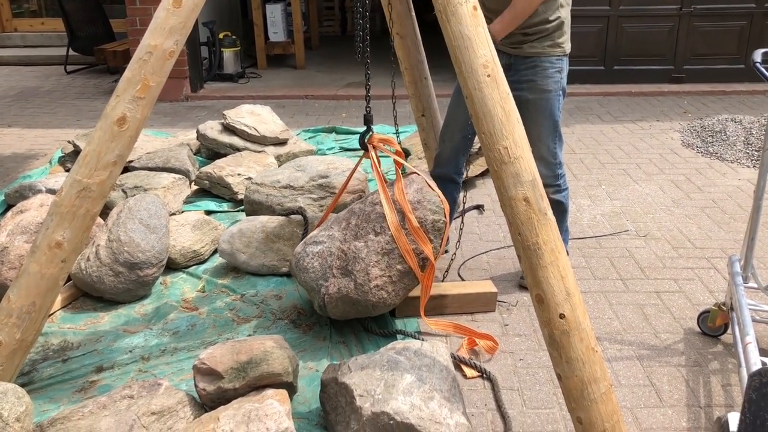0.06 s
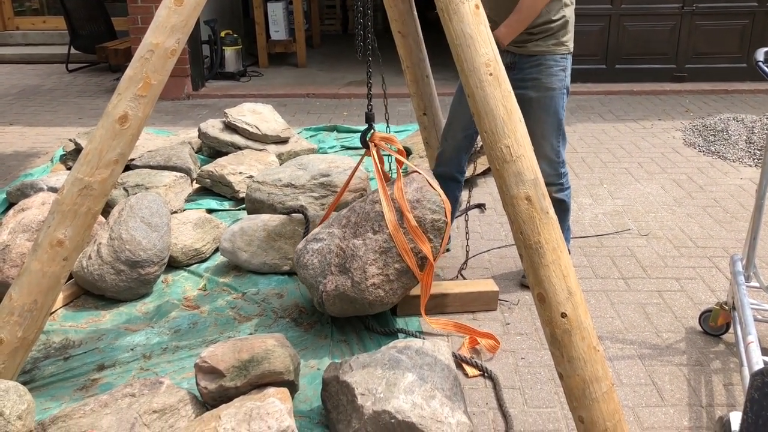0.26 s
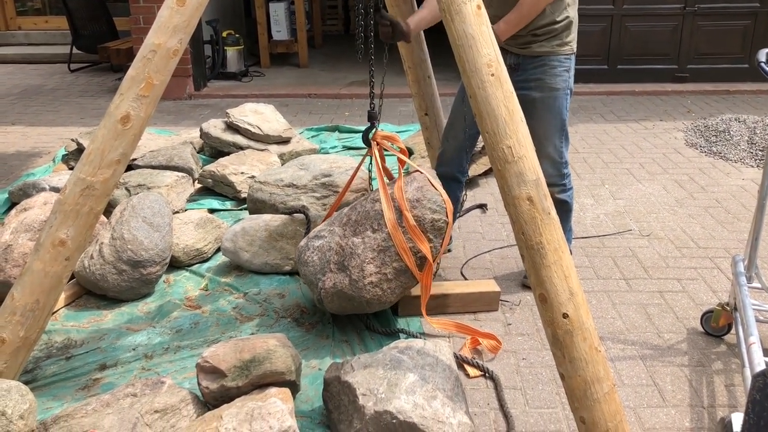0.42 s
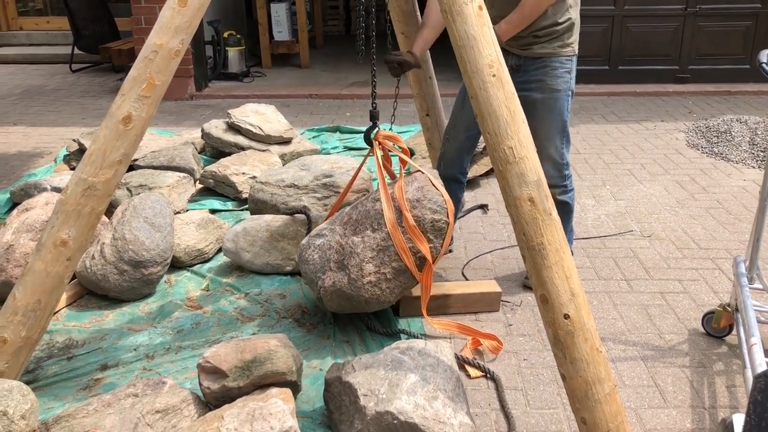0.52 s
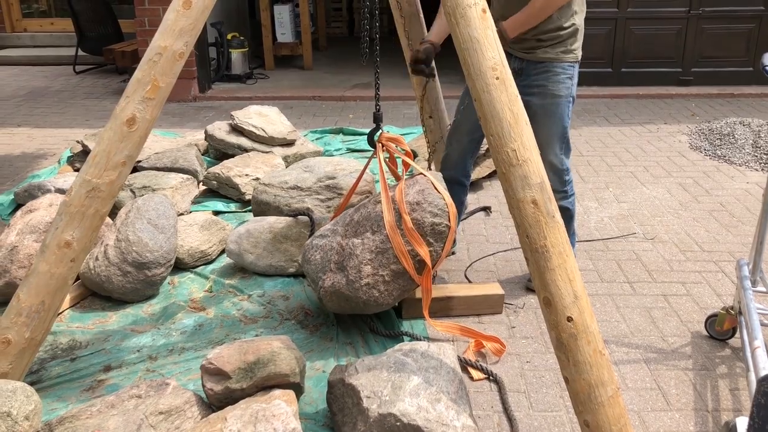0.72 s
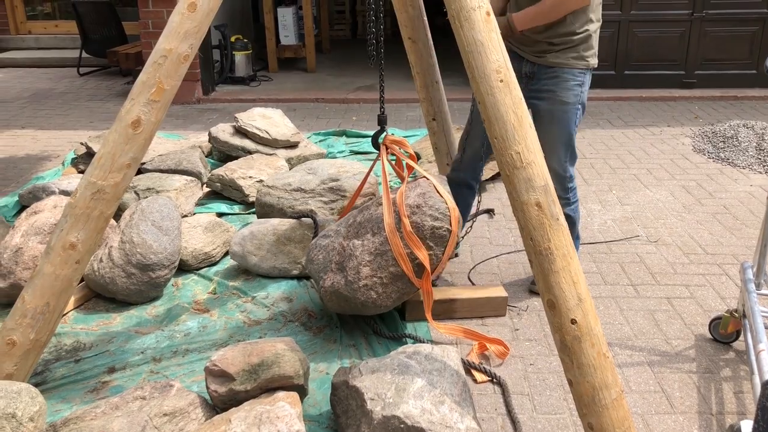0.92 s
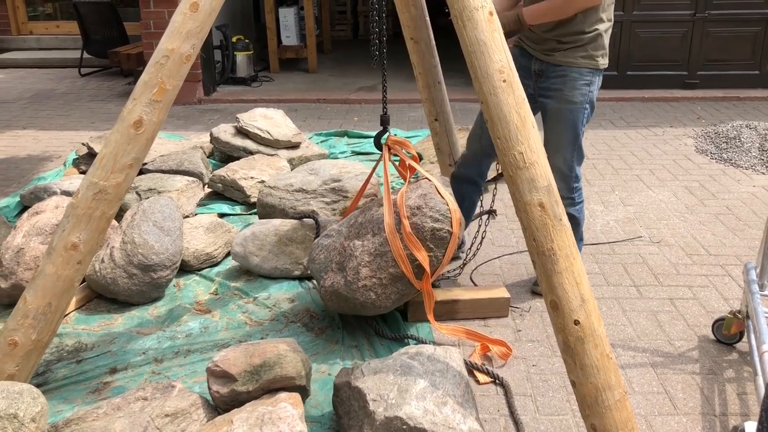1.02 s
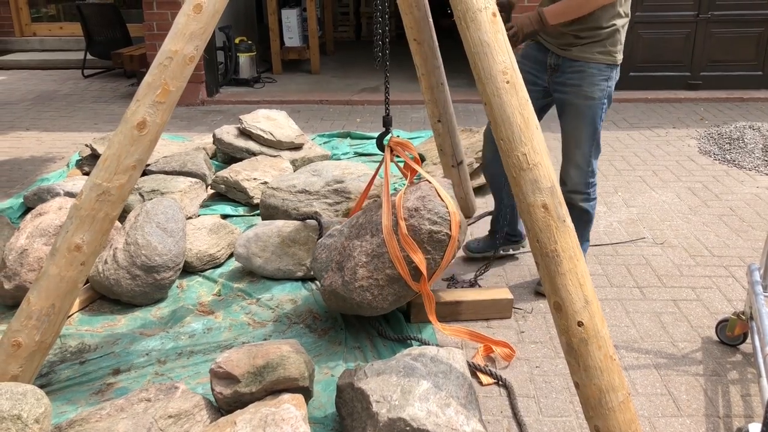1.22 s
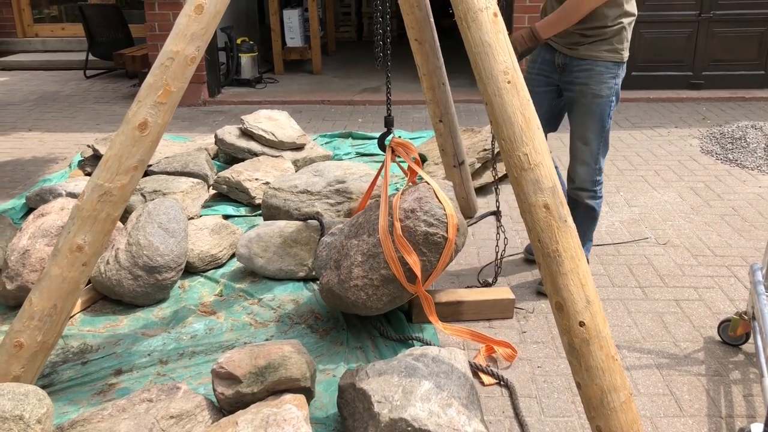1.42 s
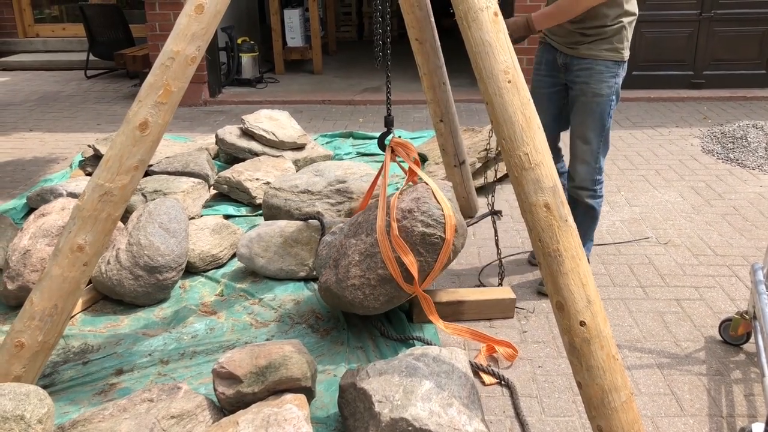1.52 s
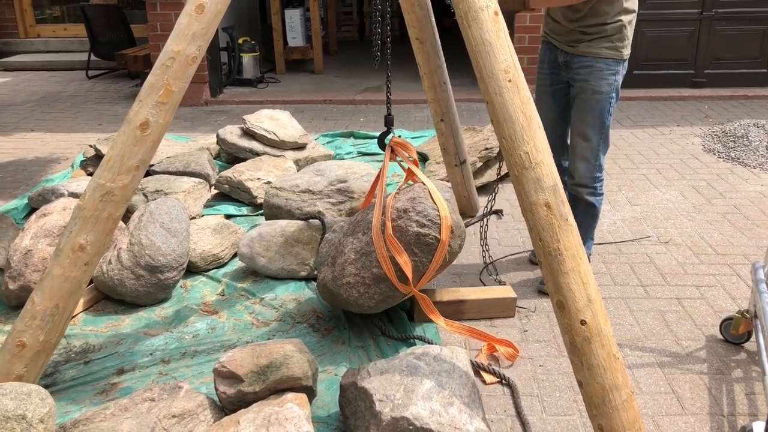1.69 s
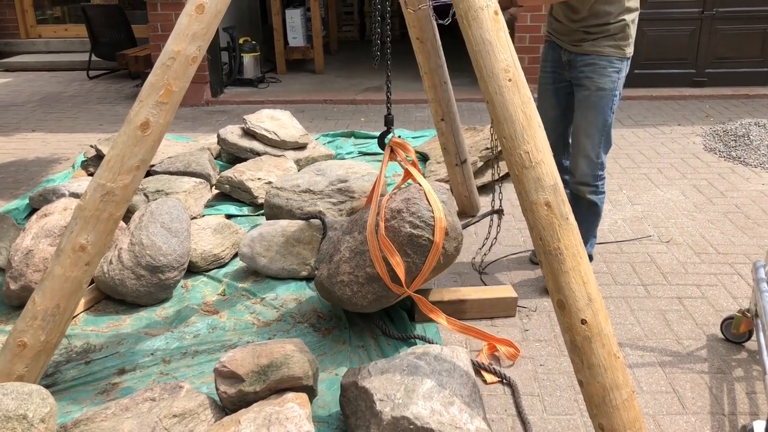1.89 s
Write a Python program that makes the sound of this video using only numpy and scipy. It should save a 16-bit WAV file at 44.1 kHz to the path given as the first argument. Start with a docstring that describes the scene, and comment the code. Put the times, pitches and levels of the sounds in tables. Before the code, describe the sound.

A hand chain hoist is pulled once outdoors. Faint clinks and a small knock start it; from 0.22 to 0.6 seconds steel links clatter rapidly, bright and ringing, over a hollow metal housing. A duller clank at 0.69 settles the load. From about 1.0 to 1.8, dry ticks, fine rustle and thin high sizzle follow, with soft footfalls near 1.45 and 1.86, over quiet low air.

```python
"""Chain hoist in a paved yard

One quick pull on a hand chain hoist that holds a boulder: steel links clatter over the hand wheel and
knock its sheet-metal housing. Sprays of tiny random contacts set housing, links and wheel ringing.
The load settles with a clank, then slack chain and straps tick as short bursts of filtered noise.
House fronts and paving answer with scattered echoes. Around it, shaped noise makes a thin high sizzle,
dull footfalls and quiet outdoor air with a low drone.
"""
import sys
import numpy as np
from scipy import signal
from scipy.fft import rfft, irfft
from scipy.io import wavfile
from scipy.ndimage import uniform_filter1d

SR = 44100
rng = np.random.default_rng(int(sys.argv[2]) if len(sys.argv) > 2 else 0)


def to_wav(sig):
    """Store sig (one row per channel, or 1-D mono) as 16-bit WAV at the path in sys.argv[1].

    Samples outside -1..1 are clipped; the rate is SR.
    """
    pcm = np.clip(np.atleast_2d(sig), -1, 1) * 32767
    pcm = np.round(pcm).astype(np.int16)
    wavfile.write(sys.argv[1], SR, pcm.T)  # frames by channels


N = 85995  # length of the sound in samples

CONTACTS_PER_S = 4500  # tiny contacts in each single strike
RUN_PER_S = 1800  # contacts of the chain running over the wheel
BITE_DB = 2.5  # first touch of a strike, over the tiny contacts

# Tone of clashing steel: pitch_hz, level_db (relative)
CLASH_COLOUR = [(60, -34), (150, -12), (500, -2.5), (1400, 0), (2300, 0.5), (3500, -3), (5500, -2),
                (7000, -1), (10000, -2), (13500, -2.5), (15500, -0.5)]


def amp(db):
    """Turns decibels into a gain."""
    return 10 ** (np.asarray(db) / 20)


def unit(x):
    """Scales a sound to an average strength (rms) of 1."""
    return x / np.sqrt(np.mean(x ** 2) + 1e-20)


def crest(x):
    """Scales a sound so that its loudest 4 milliseconds have rms 1."""
    loudest_power = uniform_filter1d(x ** 2, size=180).max()
    return x / np.sqrt(loudest_power + 1e-20)


def level(points):
    """Draws a gain curve over time through points of time (s) and level (dB)."""
    times_s, levels_db = np.transpose(points)
    return amp(np.interp(np.arange(N) / SR, times_s, levels_db))


def add(mix, s, sound):
    """Mixes a sound in at time s, cutting it off at the end of the mix."""
    part = mix[max(round(s * SR), 0):][:len(sound)]
    part += sound[:len(part)]


def colour(x, points):
    """Gives a sound the drawn spectrum with a filter that responds only after its input."""
    hz, db = np.transpose(points)
    grid_hz = abs(np.fft.fftfreq(2048, 1 / SR)) + 1  # +1 avoids the logarithm of zero
    log_gain = np.log(amp(np.interp(np.log(grid_hz), np.log(hz), db)))
    # The Hilbert transform finds the phase that puts the filter's energy as early as possible
    response = np.exp(np.conj(signal.hilbert(log_gain)))
    return signal.fftconvolve(x, np.fft.ifft(response).real)[:len(x)]


def band(hz, width_hz):
    """Makes noise in one steep resonance; its gain is halved half a width from the centre."""
    off = (np.fft.rfftfreq(N, 1 / SR) - hz) / width_hz
    spectrum = rfft(rng.standard_normal(N)) / (1 + (2 * off) ** 4)
    return unit(irfft(spectrum, N))


def ring(x, modes):
    """Lets blows ring a body: each mode is a fading tone that loses 60 dB in t60 seconds."""
    t = np.arange(SR // 3) / SR
    body = np.zeros(len(t))
    for hz, db, t60 in modes:
        fade = np.exp(-np.log(1000) * t / t60)
        body += amp(db) * fade * np.cos(2 * np.pi * hz * t)
    return signal.fftconvolve(x, body)[:len(x)]


def contacts(per_s, count):
    """Makes sparse clicks of random size at random moments."""
    return rng.standard_normal(count) * (rng.random(count) < per_s / SR)


def hoist():
    """Links strike the wheel: the housing knocks, links ring, steel clashes, and the wheel sings."""
    # Single strikes: start_s, housing_knock_db, knock_hardness_hz, link_ring_db, link_pitch_hz, clash_db
    strikes = [(.018, -60, 746, -68, 3960, -93), (.083, -58.5, 930, -57, 4360, -61),
               (.098, -44, 816, -56.5, 4370, -62), (.176, -57.5, 800, -78, 4450, -72),
               (.145, -62, 905, -63.5, 4400, -59.5), (.208, -62, 824, -66, 4370, -63),
               (.223, -50, 1480, -62, 4400, -48.5), (.229, -56, 1500, -58, 4380, -43),
               (.236, -43.5, 805, -53, 4330, -58), (.258, -52, 1500, -47.5, 4370, -36.5),
               (.273, -42.5, 1150, -44.5, 4400, -68), (.285, -39, 1220, -66, 4320, -39),
               (.295, -40.5, 1510, -54, 4400, -45), (.319, -43, 1140, -37.5, 4413, -42),
               (.334, -36.5, 1090, -43, 4460, -35), (0.361, -45.5, 1530, -36.5, 4420, -34.5),
               (0.373, -37, 1580, -43, 4160, -61), (.389, -43.5, 1220, -38, 4500, -40.5),
               (0.398, -34, 1620, -36, 4490, -33), (.409, -45.5, 1470, -47, 4150, -41),
               (.434, -46, 1520, -41, 4800, -59), (0.441, -44, 1490, -38, 4263, -36),
               (.461, -49, 1510, -32.5, 4330, -34.5), (.469, -48, 1560, -67, 4300, -52),
               (.500, -35, 1470, -40, 4400, -41.5), (.508, -51, 1520, -37.5, 4410, -63),
               (.527, -64, 1520, -45, 4370, -37), (.552, -36, 960, -34, 4504, -53),
               (0.577, -43, 1220, -40, 4440, -41), (.622, -47, 1430, -69, 4380, -54),
               (.689, -51, 1800, -57, 4450, -57.5), (.884, -61, 1560, -71, 4240, -68),
               (1.178, -67, 2600, -77, 4300, -67), (1.638, -60, 2040, -71, 4680, -66.5),
               (1.772, -61, 2360, -67, 4500, -62), (1.780, -61, 2420, -58, 4480, -59),
               (1.800, -57, 2200, -74, 4300, -61)]
    # Chain running over the wheel: start_s, level_db
    run_levels = [(0, -67), (.13, -72.5), (.22, -74), (.232, -43), (.255, -54.5), (.266, -45), (.36, -43.5),
                  (.46, -40.5), (.54, -42.5), (.59, -45.5), (.63, -54), (.67, -76)]
    # Short-lived tones of the wheel: pitch_hz, level_db, t60_s
    wheel_modes = [(2760, -0.5, 0.012), (3560, -7, 0.011), (5300, -21, 0.015), (5480, 7.5, 0.012),
                   (6320, -1, 0.039), (6570, 8.5, 0.017), (8470, 2, 0.023)]
    # Two clear wheel tones: pitch_hz, level_db, t60_s
    wheel_tones = [(3042, -11, .12), (5022, -8, .17)]
    rise_s, fall_s = 0.0033, 0.0069  # how each spray of contacts swells and fades

    t = np.arange(SR // 4) / SR
    spray = np.minimum(t / rise_s, 1) * np.exp(-np.maximum(t - rise_s, 0) / fall_s)
    main_blow = amp(11.5) * (spray == spray.max())
    knocks, links, clash = np.zeros((3, N))
    for s, housing_db, hard_hz, link_db, link_hz, clash_db in strikes:
        blows = contacts(CONTACTS_PER_S, count=len(t)) * spray
        blows += amp(BITE_DB) * (t == 0)
        add(knocks, s, amp(housing_db) * crest(knock(blows + main_blow, hard_hz)))
        add(links, s, amp(link_db) * crest(link(blows, link_hz)))
        add(clash, s, amp(clash_db) * crest(steel(blows)))

    run = level(run_levels)
    rattle = contacts(RUN_PER_S, count=N)
    scrapes = contacts(9000, count=N)  # fine contacts of the chain sliding through its guide
    # Levels in dB relative to the running chain
    knocks += amp(-3) * run * unit(knock(rattle, hard_hz=2360))
    links += amp(-13.5) * run * running_links(count=7)
    clash += amp(1.5) * run * unit(colour(scrapes, CLASH_COLOUR))

    # The wheel follows the clash; random signs turn that into noise. Levels in dB relative to the clash
    wheel_blows = clash * rng.choice([-1, 1], N)
    wheel = amp(-9) * unit(ring(wheel_blows, wheel_modes))
    wheel += amp(-17) * unit(ring(run * rattle, wheel_tones))
    return knocks + links + clash + np.std(clash) * wheel


def knock(blows, hard_hz):
    """The housing booms; soft blows reach only its low modes."""
    # Tones of the sheet-metal housing: pitch_hz, level_db (relative), t60_s
    housing_modes = [(167, -16.5, 0.055), (274, -13.5, 0.061), (407.7, -17, 0.14), (616.7, -9, 0.12),
                     (688.7, 1, 0.087), (730, 2.5, 0.1), (928, -0.5, 0.045), (970, -1.5, 0.072),
                     (1019, -2.5, 0.078), (1139, -4, 0.071), (1198, -6.5, 0.11), (1358, -3, 0.058),
                     (1414, -8, 0.071), (1633, -4, 0.039), (1882, 5.5, 0.022), (2295, 3, 0.025),
                     (2528, 6.5, 0.016)]
    low_pass = signal.butter(3, hard_hz, fs=SR, output="sos")
    return ring(signal.sosfilt(low_pass, blows), housing_modes)


def link(blows, hz):
    """One steel link rings briefly; slightly shifted modes keep any two from ringing quite alike."""
    # Tones of one link: multiple of the link's pitch, level_db (relative)
    link_modes = [(0.579, -6), (0.802, -18), (0.991, 1), (1.009, -5.5), (1.06, -12), (1.242, -6),
                  (1.53, -17)]
    t60_s = 0.04
    modes = []
    for ratio, db in link_modes:
        detune = 1 + rng.uniform(-0.01372, 0.0098)  # as a share of the pitch
        modes.append((hz * ratio * detune, db, t60_s))
    focused = signal.lfilter(*signal.iirpeak(hz, 1.6, fs=SR), blows)
    return ring(focused, modes)


def running_links(count):
    """Several links ring under the running chain, each with its own pitch and random contacts."""
    variety = 0.025  # largest pitch difference from the middle, as a share
    pitches_hz = 4370 * (1 + variety * np.linspace(-1, 1, count))
    return unit(sum(link(contacts(RUN_PER_S / count, count=N), hz) for hz in pitches_hz))


def steel(blows, fall_s=0.0043):
    """Each contact sets off a dense, very short shimmer of fading noise in the chain."""
    t = np.arange(SR // 50) / SR
    shimmer = rng.standard_normal(len(t)) * np.exp(-t / fall_s)
    return colour(signal.fftconvolve(blows, shimmer)[:len(blows)], CLASH_COLOUR)


def jolt():
    """The pull ends and the load drops back onto the brake: a fading spray of blows rings the frame."""
    # Tones of the frame's thud: pitch_hz, level_db (relative), t60_s
    frame_modes = [(259, 5.5, 0.09), (302, 0, 0.06), (415, 3, 0.12), (540, -8, 0.029), (692, 5, 0.098),
                   (1170, 8.5, 0.054), (1900, 12, 0.018), (2320, -14, 0.023), (3550, -1, 0.013)]
    start_s, level_db, fall_s = 0.690, -45, 0.0052
    t, out = np.arange(SR // 4) / SR, np.zeros(N)
    blows = contacts(CONTACTS_PER_S, count=len(t)) * np.exp(-t / fall_s)
    blows += amp(BITE_DB) * (t == 0)
    add(out, start_s, amp(level_db) * crest(ring(blows, frame_modes)))
    return out


def ticks():
    """Chain and straps settle: dry snaps with a short scatter of noise, over a fine rustle."""
    # Single ticks: start_s, level_db
    tick_events = [(0.065, -62), (1.03, -59), (1.079, -53.5), (1.083, -52.5), (1.087, -50), (1.092, -47),
                   (1.103, -56), (1.149, -49.5), (1.227, -54.5), (1.286, -51), (1.290, -60), (1.411, -58.5),
                   (1.545, -54.5), (1.578, -62), (1.585, -54.5), (1.593, -57), (1.690, -58), (1.708, -59),
                   (1.806, -49.5)]
    # Rustle between the ticks: start_s, level_db
    rustle_levels = [(0, -105), (.74, -75), (.765, -59), (.82, -79), (.95, -83), (.968, -64), (1.05, -75),
                     (1.09, -64.5), (1.2, -69), (1.23, -64), (1.38, -70), (1.55, -71), (1.6, -74),
                     (1.67, -86), (1.85, -69), (1.9, -103)]
    # Tone of ticks and rustle: pitch_hz, level_db (relative)
    tick_colour = [(200, -21), (2000, -10), (4500, 1.5), (8000, 6), (12000, 7.5), (14800, 11), (15700, 10)]
    fall_s, scatter_db = 0.0032, -16
    t = np.arange(SR // 30) / SR
    grains = unit(contacts(2000, count=N)) + 0.56 * rng.standard_normal(N)
    out = level(rustle_levels) * unit(colour(grains, tick_colour))
    for s, db in tick_events:
        scatter = rng.standard_normal(len(t)) * np.exp(-t / fall_s)
        snap = (t == 0) + amp(scatter_db) * scatter
        add(out, s, amp(db) * crest(colour(snap, tick_colour)))
    return out


def yard(x):
    """Paving and house fronts return scattered echoes that start late and fade away."""
    # Tone of the echoes: pitch_hz, level_db (relative)
    yard_colour = [(200, 6.5), (1200, -5), (3000, -1.5), (4400, -5.5), (9000, -3), (15000, -10)]
    delay_s, t60_s = 0.018, 0.43
    t = np.arange(SR // 2) / SR
    echoes = contacts(3000, count=len(t)) * (t > delay_s)
    tail = colour(echoes * np.exp(-np.log(1000) * t / t60_s), yard_colour)
    return signal.fftconvolve(x, tail / np.linalg.norm(tail))[:N]


def sizzle():
    """A thin sizzle at the top of hearing: narrow bands of noise that flutter in level together."""
    # Level of the sizzle: start_s, level_db
    sizzle_levels = [(0, -69), (.2, -72), (.3, -52), (.6, -51.5), (.78, -56.5), (.83, -65), (.958, -66),
                     (.97, -48), (1.02, -60), (1.09, -48.5), (1.21, -57), (1.225, -38), (1.27, -54),
                     (1.29, -46.5), (1.345, -51.5), (1.38, -64), (1.48, -57.5), (1.72, -62), (1.84, -73.5),
                     (1.9, -89)]
    # Its noise bands: pitch_hz, width_hz, level_db (relative)
    sizzle_bands = [(15260, 130, 0), (15730, 50, -7), (15470, 720, -3)]
    noise = sum(amp(db) * band(hz, width_hz) for hz, width_hz, db in sizzle_bands)
    flutter_db = 3 * band(0, 45.5)  # random swings of 3 dB rms, mostly slower than 23 Hz
    return level(sizzle_levels) * unit(noise * amp(flutter_db))


def steps():
    """Dull footfalls on the paving: low noise that swells quickly and dies away."""
    # Single footfalls: start_s, level_db
    footfalls = [(1.308, -64), (1.454, -51.5), (1.483, -54), (1.864, -54)]
    fall_s = 0.0075  # the swell peaks after this time, then fades
    u, out = np.arange(SR // 5) / SR / fall_s, np.zeros(N)
    for s, db in footfalls:
        thud = band(hz=96, width_hz=102)[:len(u)] * u * np.exp(-u)
        add(out, s, amp(db) * crest(thud))
    return out


def air():
    """Quiet outdoor air: shaped noise that wavers slowly, with a low drone of very narrow noise."""
    # Tone of the air: pitch_hz, level_db (relative)
    air_colour = [(20, 0.5), (35, 7.5), (55, 10), (85, 3.5), (130, 1), (250, -1.5), (400, -7.5), (900, -7),
                  (2000, -19), (4000, -24), (9000, -57.5), (15000, -33.5)]
    # Level of the air: start_s, level_db
    air_levels = [(0, -61), (.9, -63), (1.3, -62.5), (1.65, -63), (1.95, -63.5)]
    # Level of the drone: start_s, level_db
    drone_levels = [(0, -63.5), (.5, -71.5), (.75, -58.5), (.85, -108), (1.95, -74)]
    waver_db = 0.5 * band(0, 4.2)  # random swings of 0.5 dB rms
    wash = unit(colour(rng.standard_normal(N), air_colour)) * amp(waver_db)
    drone = band(hz=86.16, width_hz=0.84)
    return level(air_levels) * wash + level(drone_levels) * drone


def scene():
    """Puts the hoist in its yard, with the small sounds around it; the hoist, the settling clank and the ticks
    get echoes."""
    near = hoist() + jolt() + ticks()
    echoes = amp(-15.5) * yard(near)
    mix = near + echoes + sizzle() + steps() + air()
    return mix[None]  # one channel


def record(dry):
    """The recorder thins the deep bass and cuts off the highest treble."""
    low_cut = signal.butter(2, 76, "highpass", fs=SR, output="sos")
    thinned = signal.sosfilt(low_cut, dry)
    treble_cut = signal.firwin(511, 16000, window=("kaiser", 9), fs=SR)
    return signal.oaconvolve(thinned, treble_cut[None], "same")


dry = scene()
out = record(dry)
to_wav(out)
```